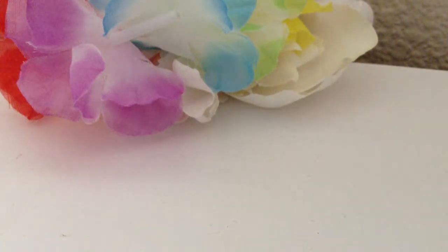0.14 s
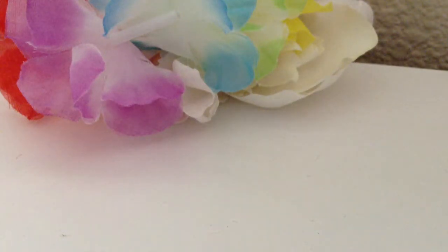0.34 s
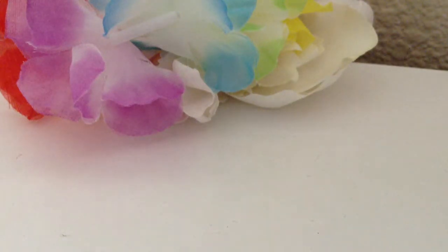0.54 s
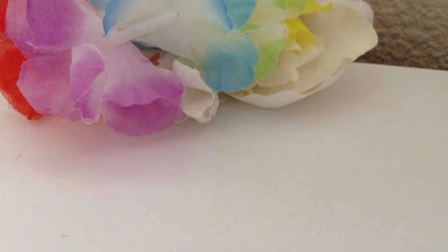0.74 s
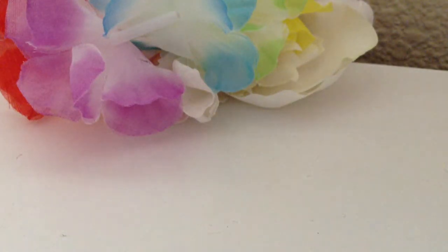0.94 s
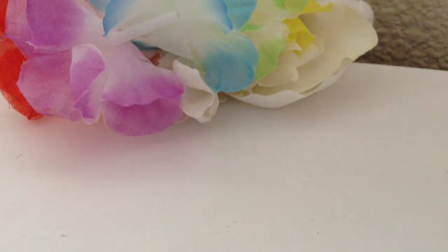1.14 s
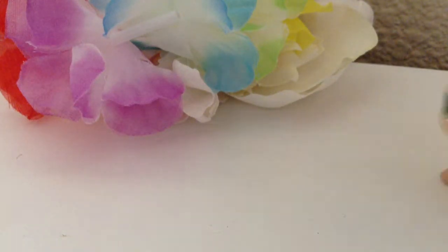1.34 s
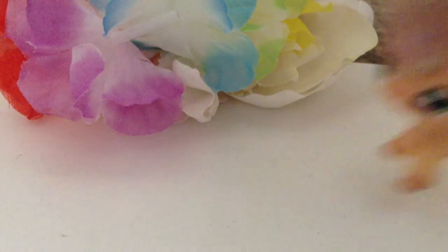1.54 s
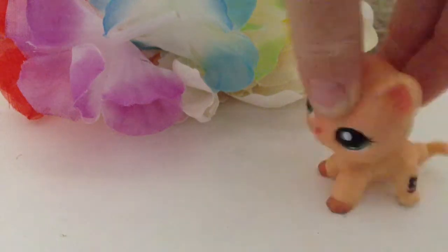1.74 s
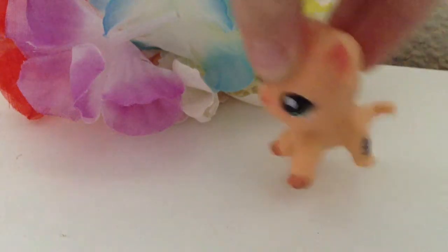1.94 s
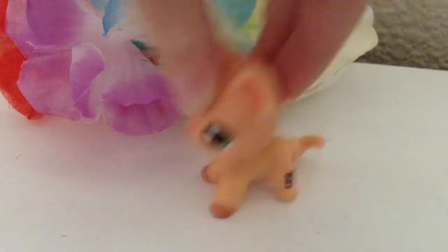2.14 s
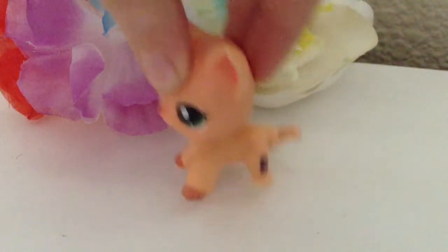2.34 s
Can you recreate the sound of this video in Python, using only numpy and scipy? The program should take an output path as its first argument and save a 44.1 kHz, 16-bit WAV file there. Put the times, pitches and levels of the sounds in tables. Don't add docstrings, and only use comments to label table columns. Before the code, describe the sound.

A small hollow plastic toy taps along a hard tabletop in uneven clacks, in a quiet room

```python
import sys
import numpy as np
from scipy import signal
from scipy.fft import rfft, irfft
from scipy.io import wavfile

SR = 44100
rng = np.random.default_rng(int(sys.argv[2]) if len(sys.argv) > 2 else 0)


def amplitude_ratio(level_db):
    exponent = np.asarray(level_db, float) / 20
    return 10 ** exponent


def inscribe(sig):
    pcm = np.round(np.clip(np.atleast_2d(sig).T, -1, 1) * 32767)
    wavfile.write(sys.argv[1], SR, pcm.astype(np.int16))


N = 110250


def rms_one(x):
    return x / np.sqrt(np.mean(x ** 2) + 1e-20)


def drift(rate_hz):
    knots = rng.standard_normal(int(N / SR * 40) + 3)
    return np.interp(np.arange(N) / SR * rate_hz, np.arange(len(knots)), knots)


# pitch_hz [Hz], level_db [dB rms]
HUM_PARTIALS = [(120, -73), (180, -87), (240, -84), (300, -84), (360, -85)]


def hum():
    wobble_db = 1.2
    t = np.arange(N) / SR
    out = np.zeros(N)
    for k, (pitch_hz, level_db) in enumerate(HUM_PARTIALS):
        level = amplitude_ratio(level_db + wobble_db * (k + 0.3) * drift(9.0))
        out += np.sqrt(2) * level * np.sin(2 * np.pi * (pitch_hz * t + rng.random()))
    return out


# pitch_hz [Hz], level_db [dB per Hz]
AIR_COLOUR = [(25, -38), (85, -13.5), (110, -25), (190, 1), (400, -0.5), (600, -7), (1000, -10),
              (15300, -17)]


def air():
    level_db, patchy_db, split_hz = -65.5, 1.0, 600
    hz = np.fft.rfftfreq(N, 1 / SR) + 1
    points_hz, points_db = np.transpose(AIR_COLOUR)
    colour = amplitude_ratio(np.interp(np.log(hz), np.log(points_hz), points_db))
    noise = rfft(rng.standard_normal(N)) * colour
    low = 1 / (1 + (hz / split_hz) ** 4)
    rumble = irfft(noise * low, N) * amplitude_ratio(patchy_db * drift(6.42))
    hiss = irfft(noise * (1 - low), N)
    return amplitude_ratio(level_db) * rms_one(rumble + hiss)


def train(start_s, gains):
    out = np.zeros(N) + 1e-18
    at = (np.asarray(start_s) * SR).astype(int)
    np.add.at(out, np.clip(at, 0, N - 1), gains)
    return out


def ring(clicks, pitch_hz, t60_s):
    r = amplitude_ratio(-60 / (t60_s * SR))
    w = 2 * np.pi * pitch_hz / SR
    return signal.lfilter([0, np.sin(w)], [1, -2 * r * np.cos(w), r * r], clicks)


def radiated(x, pitch_hz):
    band = [0.57 * pitch_hz, min(4.45 * pitch_hz, 0.45 * SR)]
    return signal.lfilter(*signal.butter(2, band, "band", fs=SR), x)


def struck(modes, start_s, level_db):
    scatter_db, place_swing_db, walk_turns_per_s = 3.5, 1, 0.48
    contact_s, chatter_db, body_db = 0.005, -12, -9.5
    linger_db, linger_times, linger_detune = -25.5, 3.4, 1.013
    out = np.zeros(N)
    luck = rng.standard_normal((30, 20))
    first, second = start_s + contact_s * rng.random((30, 2))[:len(start_s)].T
    for k, (pitch_hz, mode_db, t60_s, belly) in enumerate(modes):
        place_db = place_swing_db * np.cos(2 * np.pi * (walk_turns_per_s * start_s - belly))
        gain = -amplitude_ratio(level_db + mode_db + place_db + scatter_db * luck[:len(start_s), k])
        chatter = train(first, gain) - train(second, gain)
        clicks = train(start_s, gain) + amplitude_ratio(chatter_db) * chatter
        main = ring(clicks, pitch_hz, t60_s)
        linger = ring(clicks, pitch_hz * linger_detune, t60_s * linger_times)
        out += radiated(main + amplitude_ratio(linger_db) * linger, pitch_hz)
    return amplitude_ratio(body_db) * out


def snap(start_s, level_db):
    low_hz, top_hz, decay_s = 3630, 8030, 0.0025
    shape = signal.lfilter([1], [1, -np.exp(-1 / (decay_s * SR))], train(start_s, amplitude_ratio(level_db)))
    band = signal.butter(2, [low_hz, top_hz], "band", fs=SR, output="sos")
    return signal.sosfilt(band, shape * rng.standard_normal(N))


# start_s [s], knock_db [dB peak],
# deep_db, shell_db, snap_db [dB relative to the knock]
FOOTFALLS = [(0.1584, -55.5, -26, -7, -7), (0.2056, -23.5, 0, -8, -20.5), (0.2110, -35.5, -21, 8, -31),
             (0.3388, -41, 2, -1.5, -25), (0.3428, -58, 19, 1, 9), (0.498, -61.5, -3, -8, -7),
             (0.6590, -28.5, 1, 0.5, -15), (0.6670, -24.5, -9.5, 0, -22.5), (0.6785, -27, -7, -5, -23),
             (0.7850, -45, 3.5, -6.5, -11.5), (1.3104, -35, -17, -3.5, -28), (1.3248, -33, -24, -9, -28.5),
             (1.3536, -55, 11, 9, -12), (1.6701, -32.5, -11, -7, -7.5), (1.6768, -29, -1, -2, -13),
             (1.7760, -52, -24, -9, -25), (1.7900, -52.5, 6, -6, -25), (1.9600, -64, -11.5, 1.5, -30),
             (2.1264, -30.5, -22, -8, -19), (2.1330, -27.5, -6, 2, -37.5), (2.2030, -52, -13.5, 6.5, -17),
             (2.2120, -57.5, -18, 8, -22)]
# pitch_hz [Hz], level_db [dB], t60_s [s], belly [turns along the walk]
DEEP_MODES = [(194, -20, 0.54, 0.49), (276, -4.5, 0.19, 0.049), (318, -10.5, 0.24, 0.41),
              (393, -3.5, 0.21, 0.69), (417, -29, 0.0336, 0.056), (491, -15, 0.14, 0.2)]
# pitch_hz [Hz], level_db [dB], t60_s [s], belly [turns along the walk]
KNOCK_MODES = [(560, -41, 0.0095, 0.13), (625, -2.5, 0.12, 0.6), (686.5, 5, 0.074, 0.77),
               (765, 0.5, 0.045, 0.73), (883.6, -8, 0.11, 0.167), (990, -15, 0.093, 0.54),
               (1160, -15, 0.087, 0.14)]
# pitch_hz [Hz], level_db [dB], t60_s [s], belly [turns along the walk]
SHELL_MODES = [(1196, -4, 0.094, 0.66), (1363, -1, 0.046, 0.11), (1380, -2, 0.022, 0.99),
               (1560, 0.5, 0.045, 0.84), (1706, -4.5, 0.087, 1), (2010, -9, 0.055, 0.96),
               (2110, -1.5, 0.042, 0.11), (2250, -16.5, 0.11, 0.1), (2435, -10, 0.1, 1),
               (2667, -7.5, 0.086, 0.46), (2760, -17, 0.0237, 0.2), (3100, -26, 0.066, 0.089),
               (3900, -12.5, 0.037, 0.95), (4700, -47.5, 0.0015, 0.28)]


def steps():
    deep_delay_s = 0.0017
    start_s, knock_db, deep_db, shell_db, snap_db = np.transpose(FOOTFALLS)
    deep = struck(DEEP_MODES, start_s + deep_delay_s, knock_db + deep_db)
    knock = struck(KNOCK_MODES, start_s, knock_db)
    shell = struck(SHELL_MODES, start_s, knock_db + shell_db)
    return deep + knock + shell + snap(start_s, knock_db + snap_db)


def stand_shake():
    level_db, pitch_hz, t60_s, power = -16.5, 44.6, 0.046, 1.8
    start_s, knock_db = np.transpose(FOOTFALLS)[:2]
    return amplitude_ratio(level_db) * ring(train(start_s, amplitude_ratio(power * knock_db)), pitch_hz, t60_s)


# pitch_hz [Hz], t60_s [s], level_db [dB relative to the touch]
ROOM_BANDS = [(185, 0.21, -14), (278, 0.95, -36.5), (490, 0.21, -18), (712, 0.39, -22.5), (1210, 0.49, -29),
              (1780, 0.33, -24.5), (2920, 0.23, -31), (4850, 0.12, -36.5)]


def room():
    gap_s, shell_share, shell_from_hz = 0.00094, 0.35, 1000
    start_s, knock_db, _, shell_db, _ = np.transpose(FOOTFALLS)
    out = np.zeros(N)
    rise = np.exp(-1 / (gap_s * SR))
    for pitch_hz, t60_s, level_db in ROOM_BANDS:
        touch_db = knock_db + level_db + shell_share * shell_db * (pitch_hz > shell_from_hz)
        energy = train(start_s, amplitude_ratio(2 * touch_db))
        energy = signal.lfilter([1], [1, -amplitude_ratio(-120 / (t60_s * SR))], energy)
        energy = signal.lfilter([1 - rise], [1, -rise], energy)
        band = signal.butter(2, [pitch_hz / 1.26, pitch_hz * 1.26], "band", fs=SR, output="sos")
        out += np.sqrt(energy) * rms_one(signal.sosfilt(band, rng.standard_normal(N)))
    return out


def landed(start_s):
    feet_s = np.array(FOOTFALLS)[:, 0]
    near_s = feet_s[np.argmin(np.abs(feet_s - start_s))]
    return near_s if start_s < near_s < start_s + 0.003 else start_s


def clear_ring(start_s, level_db, pitch_hz, t60_s):
    clicks = train(landed(start_s), amplitude_ratio(level_db))
    return radiated(ring(clicks, pitch_hz, t60_s), pitch_hz)


# start_s [s], level_db [dB peak], pitch_hz
# [Hz], t60_s [s]
LANDING_RINGS = [(0.2060, -21, 724, 0.061), (0.2075, -28, 276, 0.13), (0.2115, -23.5, 707, 0.087),
                 (0.2120, -39, 410.7, 0.26), (0.3400, -44, 400, 0.157), (0.3430, -39.5, 704, 0.062),
                 (0.6592, -21.5, 690, 0.0092), (0.6680, -22, 690, 0.088), (0.6680, -36, 276, 0.11),
                 (0.6680, -33.5, 423, 0.14), (0.6680, -34, 563, 0.03), (0.6680, -19.5, 1350, 0.028),
                 (1.3105, -29.5, 814, 0.033), (1.3110, -42, 651, 0.23), (1.3120, -40.5, 419.4, 0.19),
                 (1.3259, -26.5, 836, 0.0426), (1.3270, -41, 1720, 0.046), (1.3269, -36, 1280, 0.04),
                 (1.6702, -48, 697, 0.0124), (1.6704, -35, 625, 0.11), (1.6704, -30, 1380, 0.025),
                 (1.6775, -26.5, 765, 0.067), (1.6780, -47, 670, 0.4), (1.6800, -39, 185, 0.23),
                 (1.6780, -51.5, 1840, 0.085), (2.1330, -37.5, 625, 0.076), (2.1335, -36, 428, 0.0815),
                 (2.1340, -33.5, 765, 0.072), (2.1335, -45.5, 1560, 0.19), (2.1335, -44.5, 947, 0.23),
                 (2.1340, -37.5, 2040, 0.061), (2.2090, -40, 634, 0.04),
                 (0.1590, -56, 3700, .005), (0.4970, -57, 800, 0.0206), (0.4970, -62.5, 2640, .01),
                (1.9600, -56, 860, .04), (0.2060, -29, 850, 0.041), (0.2060, -38, 1090, 0.028),
                (0.2113, -31, 2000, 0.029), (0.21, -32, 2560, 0.023), (0.21, -43.5, 3700, .025),
                (0.2113, -41.5, 2500, 0.023), (0.2060, -44, 3970, .01), (0.3390, -45.5, 1100, .03),
                (0.3390, -49.5, 2670, 0.019), (0.21, -36, 1340, 0.094), (0.6592, -33, 4160, 0.0068),
                (0.67, -26, 880, 0.03), (0.67, -28.5, 3500, 0.025), (0.6668, -38, 4900, 0.012),
                (0.6700, -40.5, 4360, 0.022), (0.6680, -29, 1238, 0.032), (0.6668, -44, 4000, .015),
                (0.6680, -26, 2199, 0.029), (0.6680, -32, 542, 0.071), (0.723, -48, 3000, .012),
                (0.7851, -48, 660, 0.017), (0.7851, -50.5, 2900, .01), (1.3106, -42, 296.7, 0.13),
                (1.3104, -43, 2660, 0.0078), (1.3106, -48, 1500, .015), (1.3270, -42.5, 2110, 0.0325),
                (1.3270, -46, 2950, 0.017), (1.6702, -38, 2460, 0.022), (1.6700, -35, 1850, 0.039),
                (1.6776, -45, 3600, 0.0184), (1.6776, -49.5, 3650, .02), (1.6702, -28, 870, 0.029),
                (2.1265, -44, 670, 0.0069), (2.1335, -31, 2150, 0.0167), (2.1338, -37, 360, 0.15),
                (2.1331, -39, 1040, 0.111), (2.1347, -40.5, 1400, 0.066), (2.1334, -38.5, 3240, 0.033),
                (2.134, -50, 4600, 0.014), (2.1345, -42.5, 4000, 0.031), (2.1335, -36, 930, 0.082),
                (2.1332, -33.5, 1770, 0.014), (2.204, -53, 6000, .005)]


def clear_rings():
    return -sum(clear_ring(*event) for event in LANDING_RINGS)


# start_s [s], level_db [dB peak], pitch_hz [Hz], t60_s [s], snap_db [dB]
LOOSE_TICKS = [(0.16, -41.5, 2720, 0.0039, -68), (0.3400, -31, 1515, 0.012, -65.5),
               (0.3435, -51, 4850, 0.0048, -65), (0.6679, -19.5, 2730, 0.022, -44),
               (0.6683, -31, 1454, 0.0125, -47), (0.8217, -47, 3900, .006, -59),
               (0.8258, -47, 8730, 0.0031, -63.5), (0.8308, -49, 11160, 0.0039, -61),
               (0.8325, -40, 1710, 0.0035, -51), (0.8366, -38.5, 3900, 0.0016, -47.5),
               (1.1917, -48.5, 4700, 0.004, -49), (1.1913, -44, 2580, 0.0046, -75),
               (1.3270, -35.5, 2055, 0.033, -55), (1.6700, -32, 2670, 0.0083, -63),
               (1.6764, -33, 1755, 0.073, -44), (2.1330, -21.5, 3600, 0.0047, -62),
               (2.1336, -33, 1630, 0.016, -41)]


def ticks():
    soft_edge = 1.47
    rings = np.zeros(N)
    for start_s, level_db, pitch_hz, t60_s, _ in LOOSE_TICKS:
        dull = signal.butter(2, min(soft_edge * pitch_hz, 0.45 * SR), fs=SR)
        rings += signal.lfilter(*dull, clear_ring(start_s, level_db, pitch_hz, t60_s))
    columns = np.transpose(LOOSE_TICKS)
    return snap(columns[0], columns[4]) - rings


# start_s [s], level_db [dB peak], pitch_hz [Hz], length_s [s]
FINGER_POP = [
    (1.1921, -38, 540, .0048),
]


def pop():
    start_s, level_db, pitch_hz, length_s = FINGER_POP[0]
    t = np.clip(np.arange(N) / SR - start_s, 0, length_s)
    swell = np.sqrt(np.abs(np.sin(np.pi * t / length_s)))
    return amplitude_ratio(level_db) * swell * np.sin(2 * np.pi * pitch_hz * t)


def scene():
    heard = steps() + room() + clear_rings() + ticks() + pop()
    bass_cut = signal.butter(7, 210.4, "high", fs=SR, output="sos")
    heard = signal.sosfilt(bass_cut, heard)
    return (hum() + air() + heard + stand_shake())[None, :]


def band_limit(x):
    return signal.sosfilt(signal.butter(12, 16190, fs=SR, output="sos"), x)


def record(dry):
    top_cut = signal.cheby2(12, 60, 15900, fs=SR, output="sos")
    mix = signal.sosfilt(top_cut, dry)
    return band_limit(mix)


dry = scene()
out = record(dry)
inscribe(out)
```